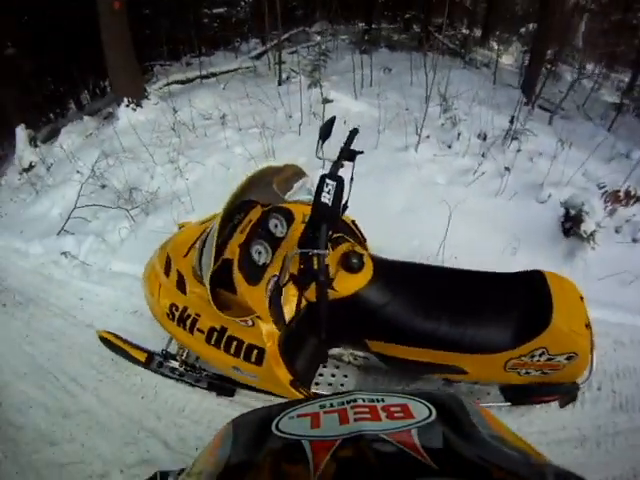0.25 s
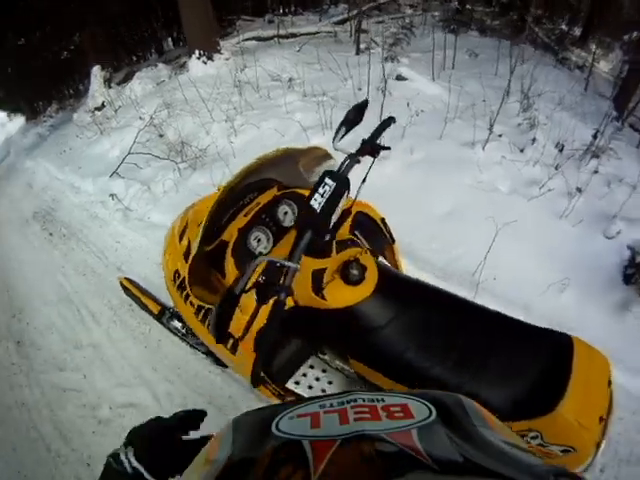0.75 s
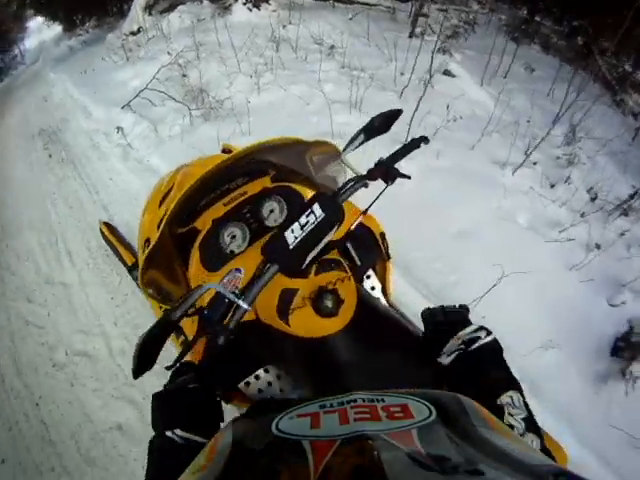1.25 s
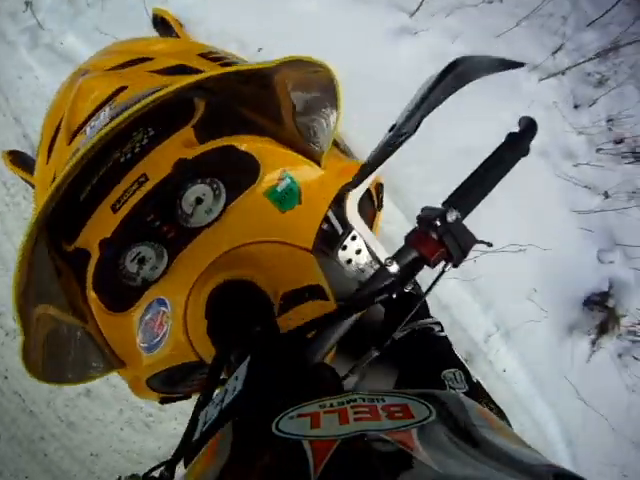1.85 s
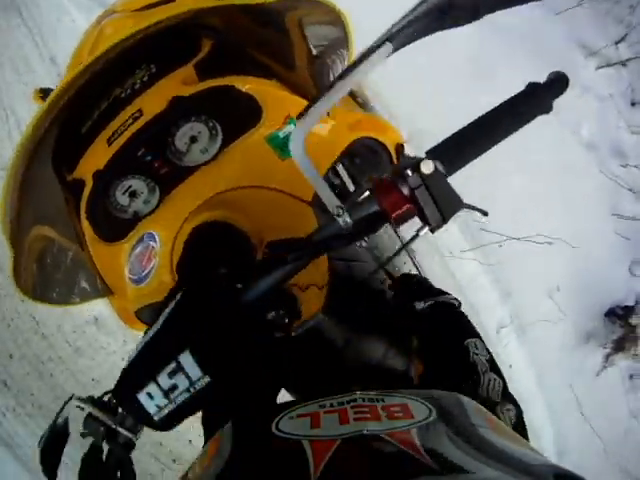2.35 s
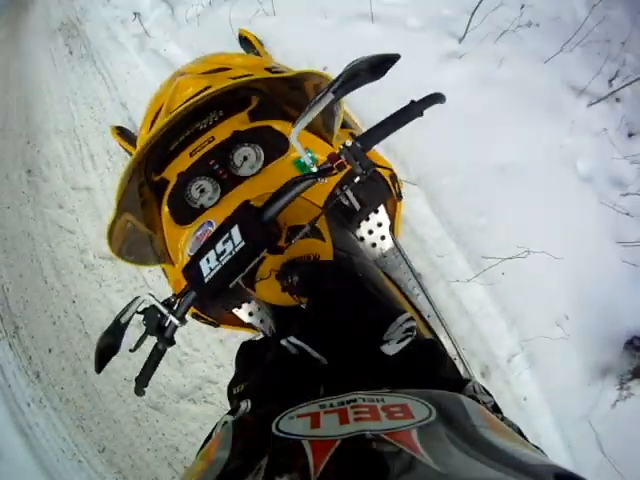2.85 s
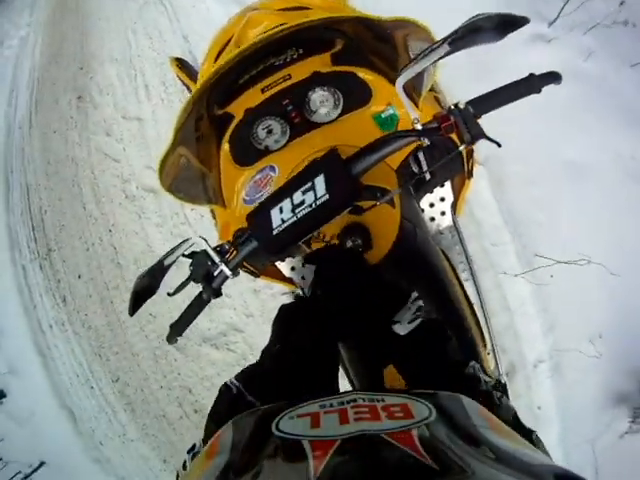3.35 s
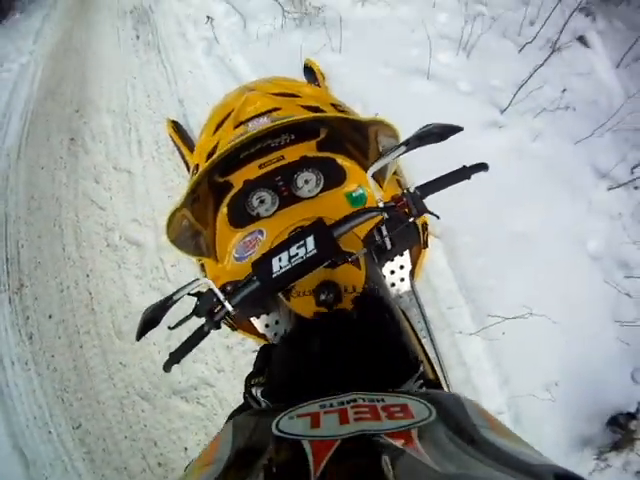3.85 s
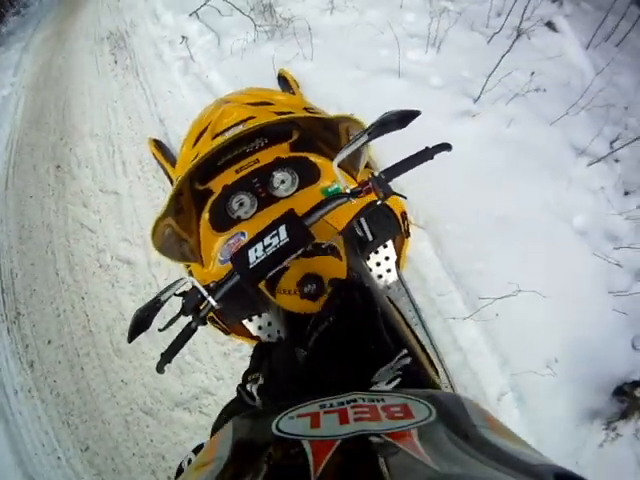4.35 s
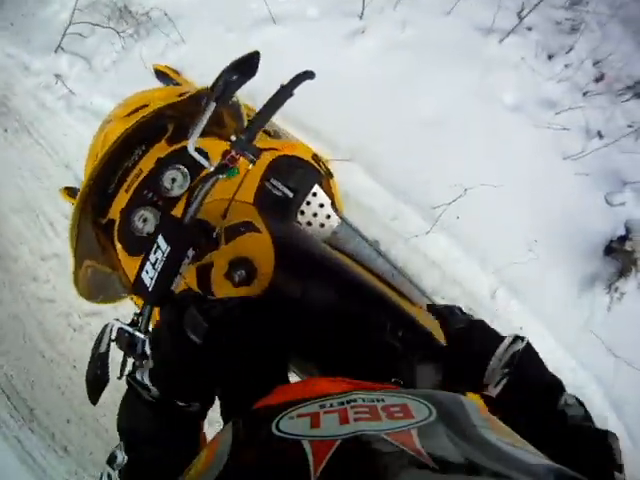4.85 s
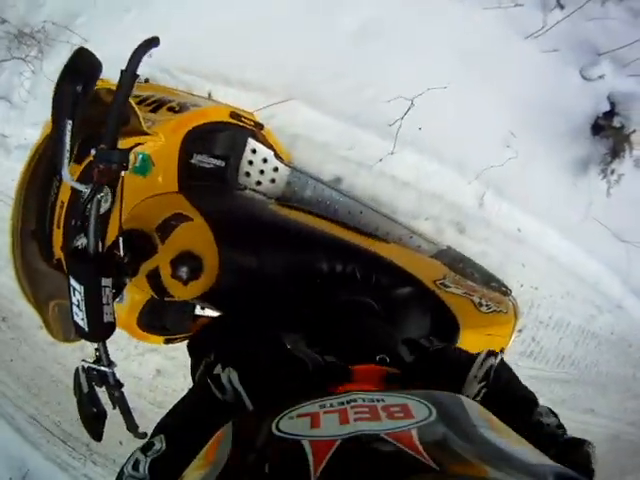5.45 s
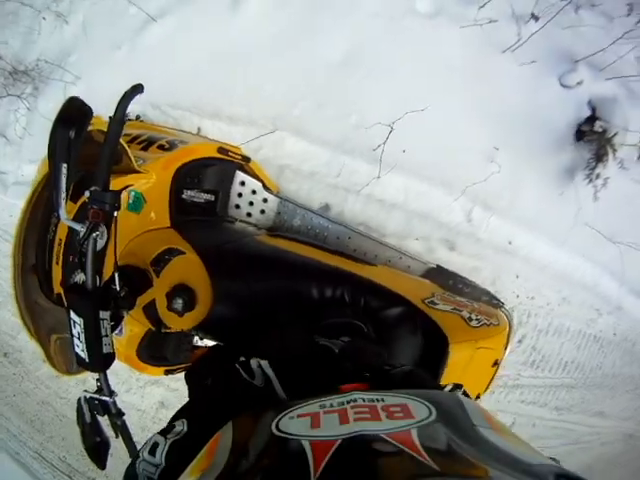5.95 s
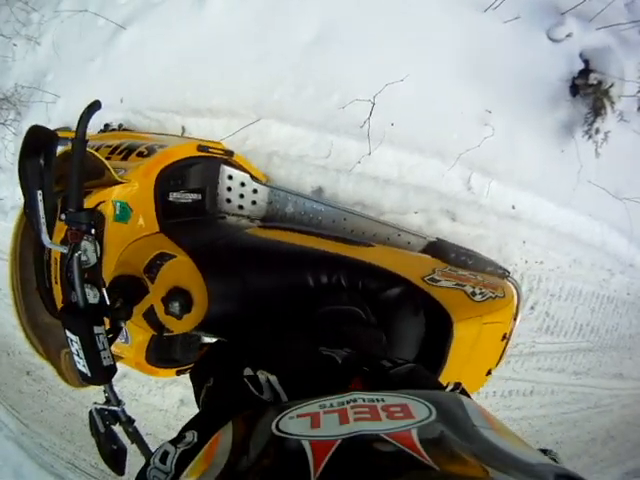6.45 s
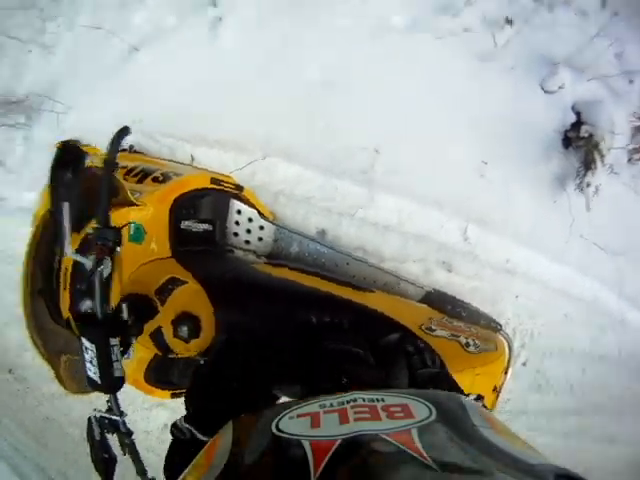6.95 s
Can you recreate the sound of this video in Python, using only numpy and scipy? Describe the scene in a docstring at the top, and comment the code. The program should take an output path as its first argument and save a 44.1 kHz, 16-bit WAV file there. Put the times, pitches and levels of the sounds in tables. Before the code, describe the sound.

A two-cylinder two-stroke snowmobile idles from start to finish, about twenty crank turns a second, hunting only slightly and never revving. A deep exhaust throb with uneven rumble sits under casing rattle, hood buzz and metallic piston slap. The microphone is on the rider's helmet, outdoors on snow, dry, with soft steady hiss and glassy treble. Around 0.5 s clothing rubs and gear creaks with faint knocks. Two small clicks near 1.7 s precede a very loud, hard double knock on the helmet shell at 1.8 s, with a soft thump. The machinery is now nearer and louder; from about 2.4 to 3.9 s a thin, bright clutch scuff stands out. A bump and creak come at 3.0 s, faint clicks at 3.6-4.0 and 4.8 s. At 5.2-5.5 s rubs and padded bumps mark the rider settling, with the boom lower. Light bumps follow at 5.9 and 6.4, a click at 6.8 and rustling at 7 s.

```python
"""Idling snowmobile from the helmet

A twin two-stroke idles in the snow while its rider steps up and sits down, heard at the helmet.
Exhaust: sines locked to the crank, loudest on the third multiple of the firing rate, plus rumble.
Engine and clutch: noise bursts at fixed crank angles, most of them ringing resonances.
Helmet, clothing and gear: knocks, soft bumps, rubs, creaks and clicks at set times.
A 12 kHz sample-and-hold adds a glassy treble."""
import sys
import numpy as np
from scipy import signal
from scipy.io import wavfile

SR = 44100
rng = np.random.default_rng(int(sys.argv[2]) if len(sys.argv) > 2 else 0)


def int16_out(signal):
    """Quantize to a 16-bit WAV file."""
    q = np.round(np.clip(np.atleast_2d(signal).T, -1, 1) * 32767)
    wavfile.write(sys.argv[1], SR, q.astype(np.int16))


N = 317520
TIME = np.arange(N) / SR

# Crankshaft idle speed, hunting slightly. Each row: time in seconds, speed in turns per minute.
SPEED_RPM = [(0, 1198.05), (.558, 1195.77), (1.34, 1215.87), (2.496, 1223.14), (2.608, 1194.79),
             (4.065, 1219.89), (5.631, 1220.98), (5.772, 1204.78), (7.064, 1220.64), (7.2, 1219.88)]
START_TURNS = -.058
# Head place. Each row: time in seconds, place (-1 beside the machine, 0 over the hood, 1 over the seat).
POSTURE = [(0, -1), (1.3, -1), (1.8, 0), (4.8, 0), (5.3, 1), (7.2, 1)]
# Machinery louder as the rider leans in. Each row: time in seconds, gain in dB.
NEARNESS_DB = [(0, -.5), (1.3, .5), (1.75, 4), (2.55, 4.5), (3.6, 3), (4.1, 1.9), (5.3, 1.5), (5.65, 0.34),
               (7.2, 0)]

# Engine part levels at the head. Each: level over the hood in dB, gain over the seat in dB
# (lost beside the machine), dB per dB of nearness.
BOOM_LEVEL = (-34, -1.85, -0.18)
OVERTONE_LEVEL = (-55.5, -10, -1.04)
CASING_LEVEL = (-61.5, 2.2, 2.07)
DRONE_LEVEL = (-60.5, .5, 1.6)
PANEL_LEVEL = (-51.5, -.1, 0.87)
PISTON_LEVEL = (-51, .1, 1.19)

# Weaker exhaust lines. Each row: multiple of the crank rate, level in dB rms.
EXHAUST_ORDERS = [(2, -58), (4, -74), (10, -71.5), (12, -70.5)]
# Resonances shaken by uneven firing. Each row: centre in Hz, width per pass in Hz, level in dB rms.
RUMBLE = [(28, 34, -57), (62.4, 22, -54), (88.3, 15, -45.5), (129.7, 23, -47), (174.2, 11, -63.5),
          (214.4, 65, -61.5)]
# Casing drone. Each row: multiple of the crank rate, relative level in dB.
DRONE = [(14, -28), (16, -5), (18, -14.5), (20, -17)]
# Casing resonances. Each row: centre in Hz, width per pass in Hz, relative level in dB,
# crank angle of the blow in turns, share of the other cylinder, gain over the seat in dB.
CASING = [(208.3, 29, -9, .5, 0.56, 9), (287, 60, -8, .52, 0.58, 6), (328.4, 120, -4.5, .58, 1, -0.5),
          (395, 98, -8.5, 0.77, 1, -6.5), (543, 270, -17, 0.55, 0.56, 9.5)]
# Engine and hood resonances. Columns as CASING.
PANELS = [(599.5, 89, -15.5, .62, 1, -2), (794, 246, -16.5, .6, 0.97, 6.5),
          (1161, 128, -12, .9, 0.53, -1.5), (1433, 320, -12, .4, 0.29, 3), (1679, 180, -10, .41, 0.68, -1),
          (1933, 214, -9.5, .89, 1, -1.5), (2318, 320, -8.5, .9, 0.62, 0), (2710, 450, -14.5, 0.34, 1, 2),
          (4890, 780, -19, .36, 0.71, -1)]
# Metallic ring of piston slap. Columns as CASING.
PISTON = [(2988, 193, -9.5, .37, 0.52, -0.5), (3220, 240, -16.5, 0.3, 0.84, -0.5),
          (3638, 250, -16, .37, 0.48, 2)]

# Clutch scuff strength. Each row: time in seconds, level in dB.
SCUFF_DB = [(0, -85), (1.6, -77), (2.3, -71), (2.43, -66.5), (3.5, -62.5), (3.95, -73), (4.6, -76),
            (5, -72), (7.2, -70.5)]
SCUFF_RISE_S, SCUFF_FALL_S = .0009, .0022
SCUFF_TURNS, SCUFF_DRAG = .885, .24  # crank angle; steady drag added to unit-rms scuffs

# Clothing rubs on the helmet. Each row: centre in seconds, effective length in seconds, level in dB.
RUBS = [(0.538, 0.3, -55.5), (3.002, 0.058, -58), (5.221, 0.08, -52.5), (5.385, 0.071, -62),
        (5.993, 0.13, -61), (6.97, 0.054, -56), (7.035, .07, -53.5)]
# Colour of the rubbing. Each row: centre in Hz, width per pass in Hz, relative level in dB.
CLOTH = [(198, 190, -8), (640, 130, -3), (1180, 360, -5.5), (1934, 360, 1.5), (2200, 750, -6)]
# Gear creaks. Each row: centre in seconds, effective length in seconds, mean pitch in Hz, peak in dB.
CREAKS = [(0.517, .08, 690, -54), (0.583, 0.025, 1103, -45), (2.997, 0.032, 645, -51.5),
          (2.998, 0.02, 202, -42), (5.39, 0.06, 640, -55)]
# Knocks on the helmet shell. Each row: time in seconds, strength in dB.
KNOCKS = [(.58, -43), (.626, -41), (1.7939, -6.5), (1.7965, -10), (2.9895, -34), (5.243, -37), (7.176, -41)]
# Shell modes. Each row: frequency in Hz, relative level in dB, 60 dB decay in seconds.
SHELL = [(187, -26, 0.16), (629, -20, 0.071), (853, -22.5, 0.036), (1137, -32.5, 0.036), (1540, -30, 0.023),
         (1950, 0, .02), (2265, .5, .009), (2530, -9, .014), (2606, -11, 0.017), (3640, -20.5, 0.031),
         (4970, -25, 0.013)]
# Soft bumps rocking the helmet. Each row: time in seconds, strength in dB, signed share of low push.
BUMPS = [(1.798, -24, 2.5), (1.828, -28, 1.5), (2.993, -33.5, -1), (5.209, -29, 12), (5.233, -25.5, 1),
         (5.389, -42, 14), (5.43, -32, -1), (5.481, -30.5, -1), (5.921, -31, 0), (6.441, -33, 2.5)]
# Dry clicks of gear and controls. Each row: time in seconds, strength in dB, band centre in Hz.
CLICKS = [(1.6861, -37.5, 2050), (1.715, -41, 3300), (3.648, -46, 1900), (3.896, -43, 1900),
          (3.991, -44, 1900), (4.821, -41.5, 4700), (6.8285, -33.5, 2300)]
CLICK_DECAY_S, CLICK_SPREAD = .0036, 1.83  # band edges: centre divided and multiplied by the spread

HOLD_HZ, CUTOFF_HZ = 12000, 15250


def from_db(db):
    """Decibels to gain."""
    return 10 ** (np.asarray(db) / 20)


def rms_one(x):
    """Scale to unit power."""
    return x / np.sqrt(np.mean(x ** 2) + 1e-20)


def white():
    """White noise over the whole scene."""
    return rng.standard_normal(N)


def in_time(rows):
    """One sample-rate curve for each column after time."""
    time_s, *columns = np.transpose(rows)
    return [np.interp(TIME, time_s, column) for column in columns]


def band(x, low_hz, high_hz):
    """Gentle band-pass."""
    edges_hz = [low_hz, min(high_hz, .45 * SR)]
    return signal.sosfilt(signal.butter(2, edges_hz, "band", fs=SR, output="sos"), x)


def resonate(x, hz, width_hz):
    """A resonance applied twice, for steep skirts; unit power."""
    r = np.exp(-np.pi * width_hz / SR)
    section = [1 - r, 0, r - 1, 1, -2 * r * np.cos(2 * np.pi * hz / SR), r * r]
    return rms_one(signal.sosfilt([section, section], x + 1e-18))


def ring(x, hz, t60_s):
    """A unit click sets off a decaying sine of initial height 1."""
    r = np.exp(-np.log(1000) / (t60_s * SR))
    w = 2 * np.pi * hz / SR
    return signal.lfilter([0, np.sin(w)], [1, -2 * r * np.cos(w), r * r], x + 1e-18)


def impulses(times_s, gains):
    """Single-sample clicks."""
    out = np.zeros(N)
    places = np.clip(np.round(np.asarray(times_s) * SR).astype(int), 0, N - 1)
    np.add.at(out, places, gains)
    return out


def fade(x, seconds):
    """Each click becomes an exponential fall of the same height."""
    return signal.lfilter([1], [1, -np.exp(-1 / (seconds * SR))], x + 1e-18)


def swell(centre_s, length_s):
    """A smooth rise and fall around one moment."""
    return np.exp(-np.pi * ((TIME - centre_s) / length_s) ** 2)


def heard_db(level):
    """Level of an engine part as the head moves around the machine."""
    db, seat_db, follows = level
    return db + seat_db * in_time(POSTURE)[0] + follows * in_time(NEARNESS_DB)[0]


def blows(crank, angle_turns, spread_db, jitter_s):
    """One contact a turn at this crank angle, uneven in strength and timing."""
    turns = np.arange(int(crank[-1])) + angle_turns % 1
    times_s = np.interp(turns, crank, TIME)
    chance = rng.standard_normal((len(times_s), 2))
    return impulses(times_s + jitter_s * chance[:, 0], from_db(spread_db * chance[:, 1]))


def harmonics(crank, lines):
    """Sines locked to the crank."""
    return sum(np.sqrt(2) * from_db(db) * np.cos(2 * np.pi * round(k) * crank) for k, db in lines)


def exhaust(crank):
    """Clean firing lines, and resonances shaken by a random difference at each firing."""
    lines = [(6, heard_db(BOOM_LEVEL)), (8, heard_db(OVERTONE_LEVEL))] + EXHAUST_ORDERS
    fired = np.diff(np.floor(2 * crank), prepend=0) > 0  # two firings a turn
    uneven = fired * np.clip(white(), -1.5, 1.5)
    rumble = sum(from_db(db) * resonate(uneven, hz, width_hz) for hz, width_hz, db in RUMBLE)
    return harmonics(crank, lines) + rumble


def clatter(crank, modes, decay_s, ping, churn, chug_db, spread_db, jitter_s):
    """Both pistons, half a turn apart, give each mode a blow and a short rattle, over a steady churn."""
    out, posture = 0, in_time(POSTURE)[0]
    # a weak firing leaves fuel for a strong one; all modes of this part share it
    firings = np.diff(rng.standard_normal(int(2 * crank[-1]) + 10))
    vigour = np.clip(rms_one(firings), -1.6, 1.6)
    chug = from_db(chug_db * vigour[(2 * crank + 1).astype(int)])
    for hz, width_hz, db, angle_turns, other_share, seat_db in modes:
        first = blows(crank, angle_turns, spread_db, jitter_s)
        second = blows(crank, angle_turns + .5, spread_db, jitter_s)
        hits = chug * (first + other_share * second)
        rattle = (churn + fade(hits, decay_s)) * white()
        out = out + from_db(db + seat_db * posture) * resonate(ping * hits + rattle, hz, width_hz)
    return out


def casing(crank):
    """Low casing modes struck by both cylinders, with a crank-locked drone."""
    rasp = clatter(crank, CASING, decay_s=.0062, ping=12.3, churn=.23,
                   chug_db=2.2, spread_db=1.6, jitter_s=.0002)
    drone = harmonics(crank - .66, DRONE)
    return from_db(heard_db(CASING_LEVEL)) * rasp + from_db(heard_db(DRONE_LEVEL)) * drone


def panels(crank):
    """Engine and hood modes rattled by both cylinders."""
    rattle = clatter(crank, PANELS, decay_s=.0079, ping=7.6, churn=.5,
                     chug_db=1.6, spread_db=1.5, jitter_s=.0007)
    return from_db(heard_db(PANEL_LEVEL)) * rattle


def piston_slap(crank):
    """Narrow metallic modes struck at fixed crank angles."""
    slap = clatter(crank, PISTON, decay_s=.0081, ping=13.2, churn=.21,
                   chug_db=.5, spread_db=.8, jitter_s=.0004)
    return from_db(heard_db(PISTON_LEVEL)) * slap


def clutch(crank):
    """A thin, bright scuff once a turn, with a light drag between."""
    touches = blows(crank, SCUFF_TURNS, spread_db=1.5, jitter_s=.0002)
    scuff = SCUFF_DRAG + rms_one(fade(fade(touches, SCUFF_FALL_S), SCUFF_RISE_S))
    return from_db(in_time(SCUFF_DB)[0]) * rms_one(band(scuff * white(), 4700, 5650))


def air():
    """Steady band of soft noise."""
    return from_db(-56.5) * rms_one(band(white(), 150, 2600))


def clothing():
    """Grainy friction that swells and dies with each move, and creaks of wavering pitch."""
    rubbing = sum(from_db(db) * swell(centre_s, length_s) for centre_s, length_s, db in RUBS)
    grains = white() * (rng.random(N) < 1500 / SR)  # about 1500 a second
    rustle = rubbing * sum(from_db(db) * resonate(grains, hz, width_hz) for hz, width_hz, db in CLOTH)
    waver = 1 + .019 * resonate(white(), 60, 80)
    wavering_s = np.cumsum(waver) / SR
    creaks = sum(from_db(db) * swell(centre_s, length_s) * np.sin(2 * np.pi * hz * wavering_s)
                 for centre_s, length_s, hz, db in CREAKS)
    return rustle + creaks


def helmet():
    """Hard knocks crack and ring the shell, whose main modes beat; soft bumps rock it on its padding."""
    times_s, db = np.transpose(KNOCKS)
    knocks = impulses(times_s, from_db(db))
    shell = sum((-1) ** k * from_db(mode_db) * ring(knocks, hz, t60_s)
                for k, (hz, mode_db, t60_s) in enumerate(SHELL))
    crack = from_db(-23) * fade(knocks, .0024) * rms_one(band(white(), 550, 2400))
    times_s, db, push = np.transpose(BUMPS)
    rocking = band(ring(impulses(times_s, from_db(db)), 89, t60_s=.39), 47, 350)
    sway = band(ring(impulses(times_s, from_db(db) * push), 31, t60_s=.023), 11, 190)
    return shell + crack + rocking + sway


def gear():
    """Each click is a short noise burst with a brightness of its own."""
    noise, out = white(), 0
    for time_s, db, hz in CLICKS:
        burst = fade(impulses([time_s], from_db(db)), CLICK_DECAY_S)
        out = out + burst * rms_one(band(noise, hz / CLICK_SPREAD, hz * CLICK_SPREAD))
    return out


def scene():
    """The crank drives all engine layers, the head's place sets their balance; snow gives no echo."""
    crank = START_TURNS + np.cumsum(in_time(SPEED_RPM)[0]) / 60 / SR  # turns
    engine = exhaust(crank) + casing(crank) + panels(crank) + piston_slap(crank) + clutch(crank)
    return (engine + air() + clothing() + helmet() + gear())[None]


def record(dry):
    """Each 12 kHz sample is held for four steps, mirroring the sound around 6 and 12 kHz; the top is cut."""
    slow = signal.resample_poly(dry, HOLD_HZ, SR, axis=-1)
    steps = np.repeat(slow, 4, axis=-1)
    held = signal.resample_poly(steps, SR, 4 * HOLD_HZ, axis=-1)
    return signal.sosfilt(signal.ellip(14, .1, 80, CUTOFF_HZ, fs=SR, output="sos"), held)


dry = scene()
out = record(dry)
int16_out(out)
```